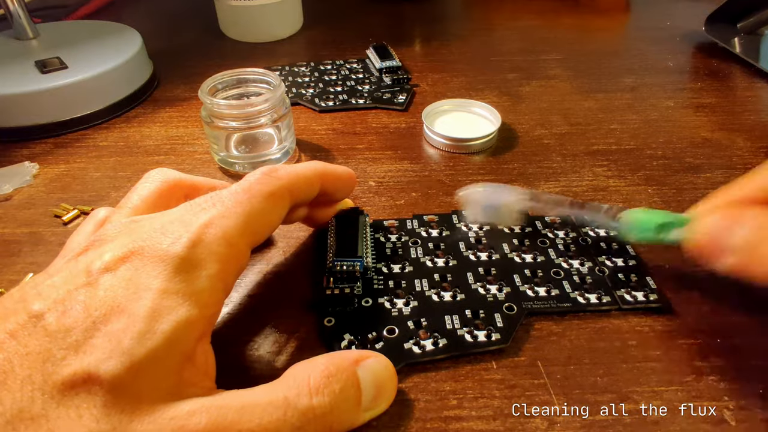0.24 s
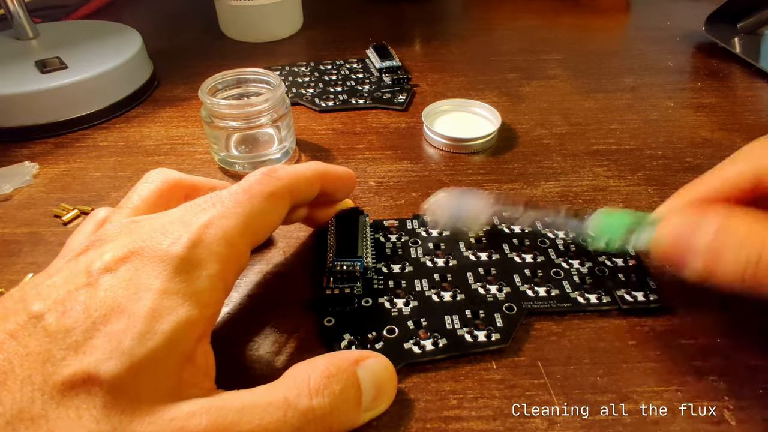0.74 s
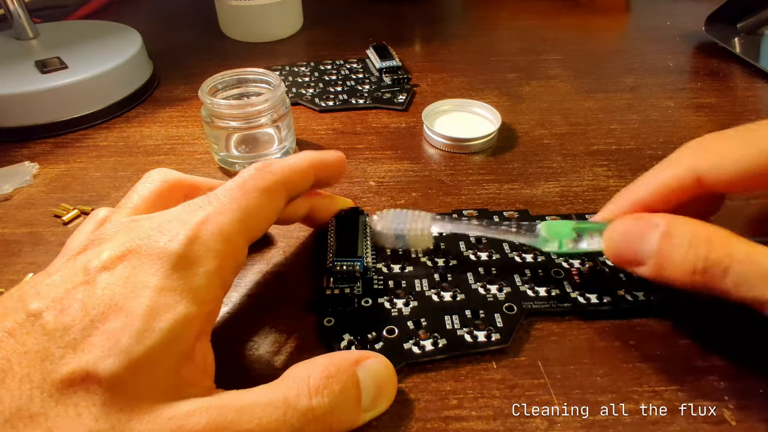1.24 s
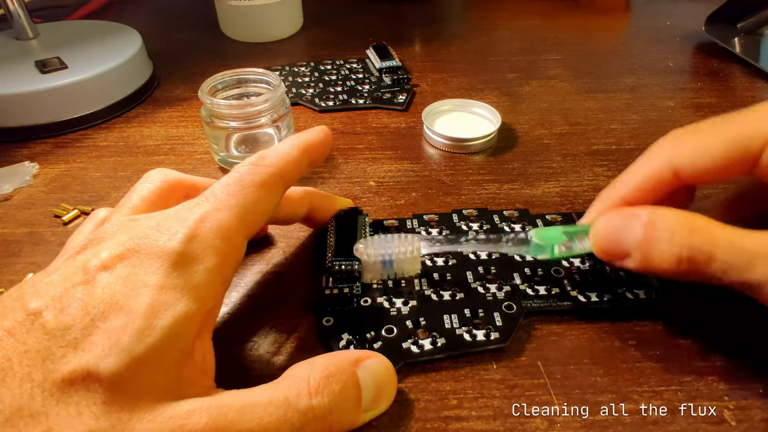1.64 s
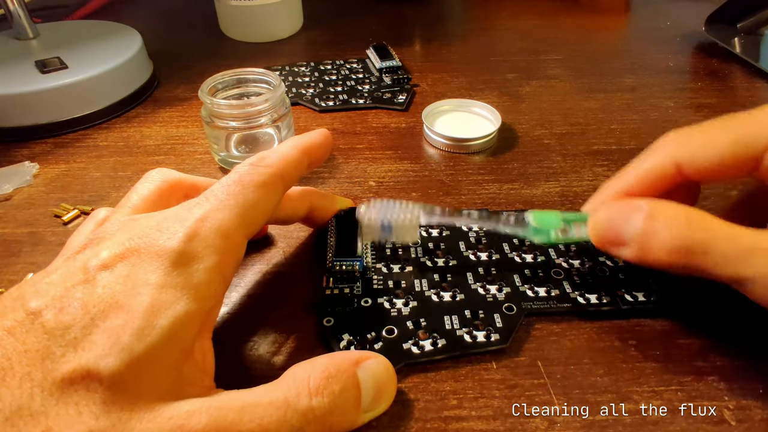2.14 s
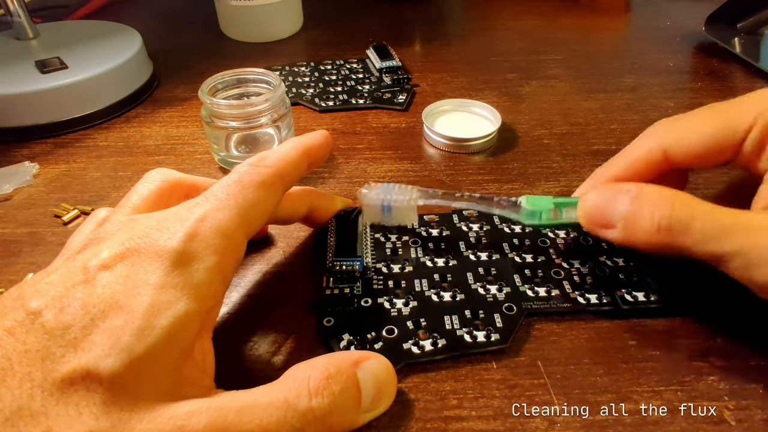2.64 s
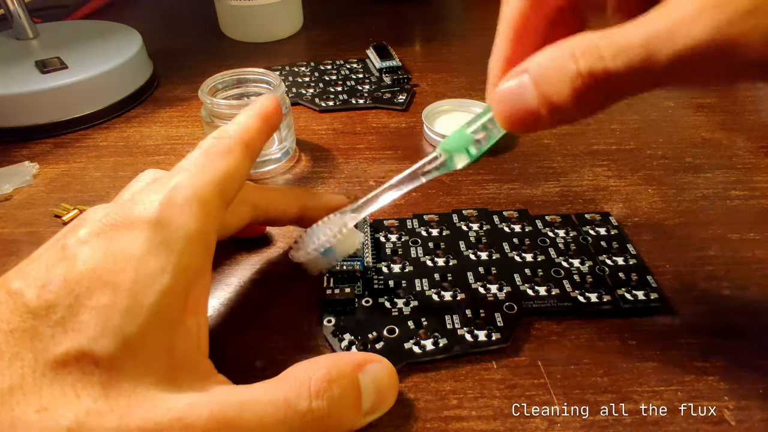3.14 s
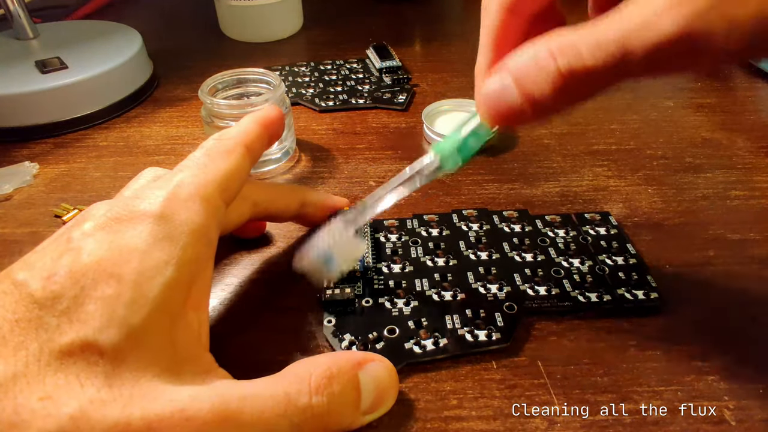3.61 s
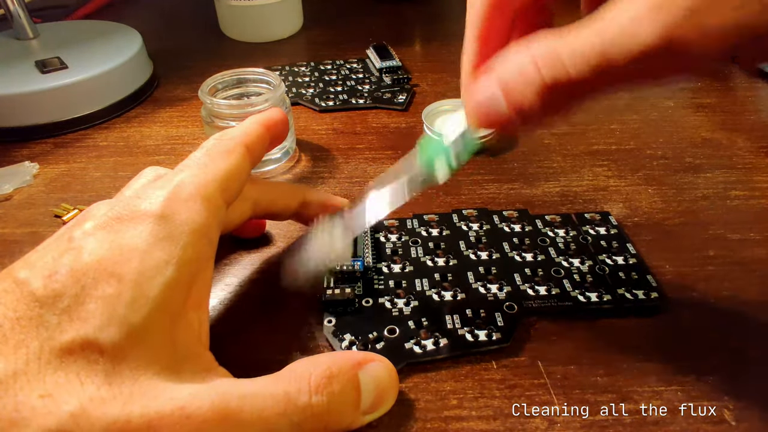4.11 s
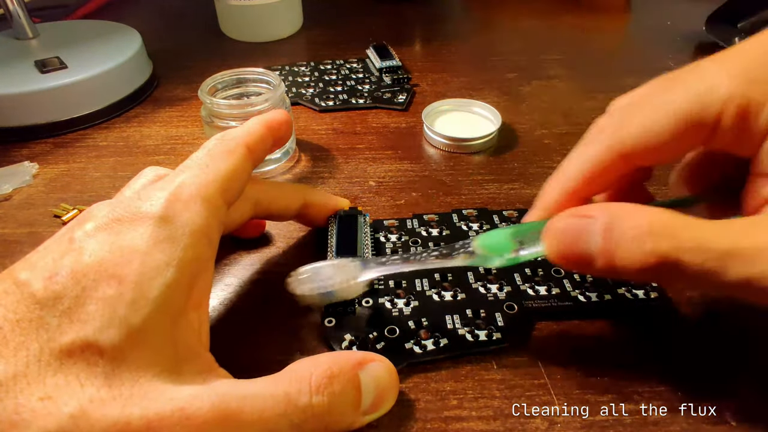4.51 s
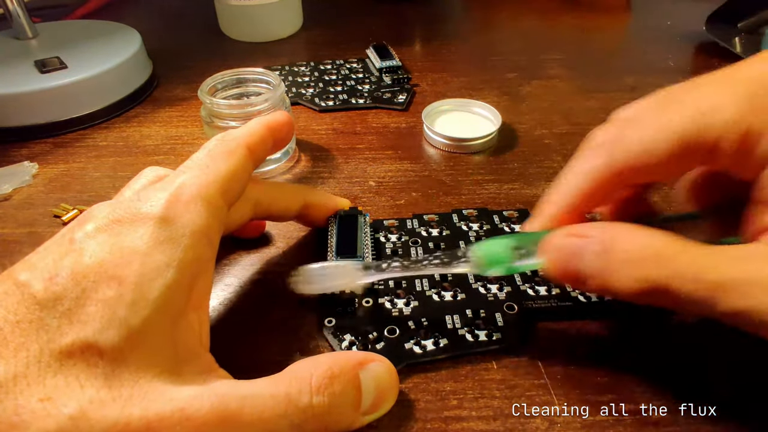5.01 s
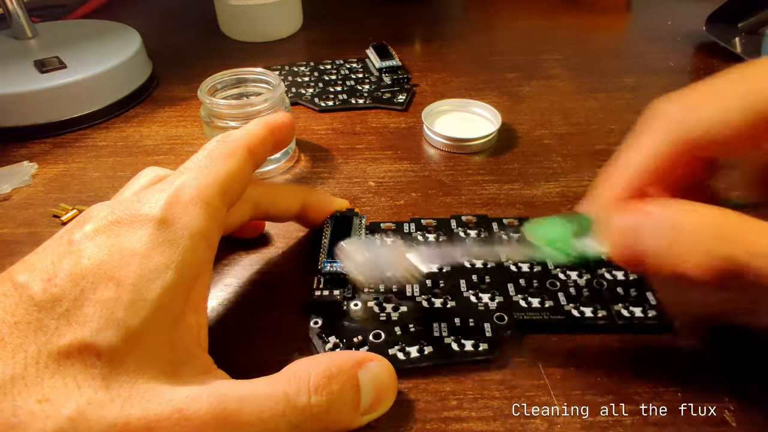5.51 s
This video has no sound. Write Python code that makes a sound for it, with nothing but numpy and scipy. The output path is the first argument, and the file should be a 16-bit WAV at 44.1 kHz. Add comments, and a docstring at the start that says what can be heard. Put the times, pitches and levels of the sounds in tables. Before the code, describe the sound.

A toothbrush scrubs a circuit board on a wooden desk in quick raspy strokes, pauses briefly, then ends with a sharp clack and scrape.

```python
"""Toothbrush on a circuit board

A toothbrush scrubs a circuit board held on a wooden desk, about nine strokes a second.
Random bristle clicks make the hiss and, through resonant filters, the rasp, plate tones and rattle.
Decaying board modes knock, and a low rumble, hums, a drone and room hiss lie underneath.
Near the end the board slips: filtered noise bursts clack, modes ring and grainy noise scrapes on wood."""
import sys
import numpy as np
from scipy import signal
from scipy.fft import rfft, irfft
from scipy.io import wavfile
from scipy.ndimage import uniform_filter1d, map_coordinates

SR = 44100
rng = np.random.default_rng(int(sys.argv[2]) if len(sys.argv) > 2 else 0)


def wav_record(signal):
    """Record a signal, one row per channel, as 16-bit PCM in the file named by sys.argv[1]."""
    frames = np.transpose(np.atleast_2d(signal))
    bounded = np.clip(frames, -1, 1)
    # unit amplitude maps onto the largest positive 16-bit level
    quanta = np.round(bounded * 32767).astype(np.int16)
    wavfile.write(sys.argv[1], SR, quanta)


N = 253575
TIME = np.arange(N) / SR

# Tables named SPECTRUM set a tone colour only; their overall level is normalised away.
# deep rumble under everything: t/s, level/dB
RUMBLE_LEVEL = [(1.2, -50.5), (1.55, -59), (2.4, -52), (4, -46.5)]
# rumble colour: f/Hz, density/dB per Hz
RUMBLE_SPECTRUM = [(10, -21), (28, 10), (60, -13), (300, -41.5)]
# upper hum that swells and fades: t/s, level/dB
HUM_LEVEL = [(3.6, -67.5), (4.6, -43.5), (5.2, -54.5)]
# low drone before its flutter: t/s, level/dB, f/Hz
DRONE = [(.85, -55, 125), (1.24, -37.5, 125), (1.399, -51, 129.2), (2.15, -52.5, 150.9), (3, -63, 149)]
# room hiss colour: f/Hz, density/dB per Hz
ROOM_TONE_SPECTRUM = [(35, -29.5), (60, -10.5), (156, -11), (613, -22.5), (15500, -54.5)]
# to-and-fro strokes: middle t/s, pressure as drive level of the hiss/dB
STROKES = [(0.041, -41.5), (0.127, -39.5), (.19, -42), (0.289, -38), (.417, -36), (.543, -36.5),
           (0.668, -37), (0.787, -36.5), (0.912, -37), (1.025, -37.5), (1.155, -39), (1.288, -45.5),
           (1.412, -51.5), (1.53, -45.5), (1.642, -40.5), (1.73, -59), (1.869, -54), (2.001, -57),
           (2.106, -50.5), (2.206, -51), (2.325, -49.5), (2.432, -44.5), (2.533, -45), (2.642, -43.5),
           (2.752, -43.5), (2.855, -37.5), (3.354, -53.5), (3.474, -48), (3.564, -43.5), (3.678, -43.5),
           (3.774, -40), (3.879, -42.5), (3.97, -39), (4.074, -44), (4.164, -36), (4.264, -42),
           (4.372, -46), (4.61, -54), (4.721, -42.5), (4.833, -41), (4.967, -39), (5.071, -40.5),
           (5.19, -37), (5.306, -37.5), (5.427, -34.5), (5.525, -40.5), (5.585, -38)]
# stroke length, long at first and shortest near the end: t/s, nominal length/s
STROKE_LENGTH = [(1.0, .1), (1.3, 0.067), (2.5, 0.082), (3.5, 0.059), (4.27, 0.056), (4.38, 0.097),
                 (5.43, 0.071), (5.53, 0.041)]
# board's answer where the brush works: t/s, extra rasp drive/dB, rattle drive over the rasp drive/dB
GRIP = [(.1, -1.5, 3.5), (.5, -1, -3), (1.1, -2, 6), (1.449, -1.5, -12), (1.97, -6, 2), (2.12, 2, -9.5),
        (2.7, 2.5, -6), (3.5, -1.5, -14), (3.9, -3, 6.5), (4.72, 2, -4), (5.399, 0.5, -4)]
# bristle hiss colour: f/Hz, density/dB per Hz
HISS_SPECTRUM = [(700, -16.5), (2200, -5.5), (3300, -2.5), (7500, 2), (10000, 0.5), (12000, -1.5),
                 (15000, 0.5)]
# rasp colour through the board: f/Hz, density/dB per Hz
RASP_SPECTRUM = [(70, -39.5), (110, 3), (150, 1.5), (220, -5.5), (380, 3.5), (530, 2.5), (820, -9),
                 (1250, -7), (2000, -14.5), (9000, -33)]
# hollow plate tones the bristles wake: centre f/Hz, width/Hz, relative level/dB
PLATE_TONES = [(695, 55, 0), (915, 60, -2), (1300, 190, -2.5)]
# board modes on the desk, main one second: f/Hz at BOARD_HZ, relative level/dB, t60/s
BOARD_MODES = [(144.9, -12, 0.22), (377, 9, 0.055), (498.5, -2.5, 0.072), (906, -9, 0.038),
               (1384, -22, 0.04)]
# board rocks against the desk: t/s, peak level/dB, tuning f/Hz against BOARD_HZ, swell/s
KNOCKS = [(0.133, -28, 348, 0.012), (0.284, -16, 350, 0.0018), (.548, -28, 360, 0.0027),
          (0.642, -25, 337, 0.0087), (0.793, -14, 371, 0.015), (.837, -27, 355, 0.0041),
          (1.034, -20, 366, 0.0077), (1.667, -29, 355, 0.0013), (1.829, -28.5, 328, 0.0026),
          (2.878, -21.5, 359, 0.0011), (2.991, -28.5, 344, 0.023), (3.75, -35, 374, 0.015),
          (4.126, -29.5, 376, 0.00095), (4.18, -29.5, 336, 0.012), (4.218, -27, 362, 0.0012),
          (4.364, -15.5, 347.5, 0.0028), (4.472, -32, 392, 0.0027), (5.519, -23.5, 409, 0.00066),
          (5.564, -20.5, 331, 0.00055), (5.616, -20.5, 380, 0.00067), (5.719, -34, 378, 0.0031)]
# short dry clicks of the brush, and the crack of two hard board knocks:
# t/s, level before colouring/dB, decay/s, dulling/dB per octave
CLICKS = [(0.284, -35, 0.003, 10), (0.997, -34.5, 0.0043, 6), (1.761, -39.5, 0.0037, 2),
          (2.479, -36.5, 0.0061, 9.5), (3.272, -45, 0.0089, 1), (4.361, -37.5, 0.0086, 14.5)]
# brush head catches on solder joints: t/s, level before colouring/dB
TAPS = [(.909, -35), (1.128, -37), (2.187, -38.5), (2.294, -40.5), (2.611, -36), (3.728, -39), (3.935, -40),
        (4.671, -36), (5.028, -32.5), (5.15, -36.5)]
# faint narrow bands of high hiss: middle t/s, length/s, level/dB, centre f/Hz
HISS_BANDS = [(1.404, 0.42, -56.5, 4200), (4.63, 0.11, -56, 4160)]
# colour of a narrow hiss band: multiple of the centre f, density/dB per Hz
BAND_SPECTRUM = [(.3, -10), (1.05, 0), (1.6, -24)]
# board skids on the wood: start t/s, length/s, level before side trim/dB, release/s, dulling/dB per octave
DRAG = [(5.521, 0.032, -31.5, 0.0059, 3.5), (5.632, 0.016, -34, 0.064, 1),
        (5.716, 0.016, -32.5, 0.0235, 1.2)]
# wood grain colour: f/Hz, density/dB per Hz
WOOD_SPECTRUM = [(60, -2), (175, 11.5), (400, 10), (900, 5.5), (3700, -2.5), (16000, -35)]
# board slaps down and chatters: t/s, level before colouring/dB, decay/s, dulling/dB per octave
CLACK = [(5.6107, -27, 0.0014, 21), (5.613, -3.5, 0.001, 2), (5.6155, -9.5, 0.0025, 0)]
# clack colour: f/Hz, density/dB per Hz
CRACK_SPECTRUM = [(50, -40), (160, 2), (800, 11.5), (1500, 3), (7500, -6.5), (11000, -16), (16000, -30)]
# hollow pock from the flat of the board: f/Hz, level before side trim/dB
SLAP = [(700, -15.5), (900, -16.5)]
# free ringing once the board slips from under the hand: f/Hz, level before side trim/dB
FREE_MODES = [(179, -23), (335, -22), (510, -24), (876, -28), (1564, -38), (2246, -42), (2576, -39),
              (3020, -39)]
# stereo width: f/Hz, left-right likeness (1 = same, 0 = unrelated, below 0 = opposed)
LIKENESS = [(450, 0.97), (670, -0.24), (800, 0.44), (1500, -0.23), (2200, -0.062)]
# room decay: f/Hz, t60/s
ROOM_DECAY = [(300, 0.41), (3000, 0.6), (12000, 0.18)]

LOW_HUM_HZ, HIGH_HUM_HZ = 33.3, 55.5
# the rasp grows more slowly than the hiss: drive dB at 0 dB pressure, dB per dB
RASP_DB, RASP_LAW = -18.5, 0.66
SETTLE_DB, SETTLE_S = -8, 0.05  # shuffle after every stroke: relative level, amplitude decay
PLATE_DB, PLATE_DRIFT = -2.5, .018  # mix gain, rms pitch shift from stroke to stroke as a share
BOARD_HZ = 365  # tuning at which the board modes keep their tabled pitch
HARD_DB, QUICK_S = -19, .005  # a knock louder and quicker than this bounces once
BOUNCE_S, BOUNCE_DB, BOUNCE_SWELL_S = 0.01106, -5.5, 0.0032  # delay, level against the knock, swell
TAP_PEAK_S = 0.0027  # a tap's envelope peaks here, then decays at the same pace
SKID_ATTACK_S, CLACK_RISE_S = 0.0028, 0.00012
SLAP_T60_S, FREE_T60_S = 0.029, 0.17
EDGE_HZ = 15950  # upper band limit


def amp(db):
    """Decibels to gain."""
    return 10 ** (np.asarray(db) / 20)


def evened(x):
    """Scales to rms 1."""
    return x / np.sqrt(np.mean(x ** 2) + 1e-20)


def read(points, hz):
    """Reads a spectrum table on a log-frequency axis."""
    f, value = np.transpose(points)
    return np.interp(np.log(hz + 1), np.log(f + 1), value)


def level(curve):
    """A dB curve as a gain for every sample."""
    return amp(np.interp(TIME, *np.transpose(curve)))


def add(mix, s, sound):
    """Mixes a sound in at time s."""
    part = mix[:, max(round(s * SR), 0):][:, :sound.shape[-1]]
    part += sound[..., :part.shape[-1]]


def colour(x, spectrum, tilt_db=0):
    """Minimum-phase filter of unit energy, then left and right share each band by its likeness."""
    hz = np.fft.rfftfreq(8192, 1 / SR)
    log_gain = np.log(amp(read(spectrum, hz) - tilt_db * np.log2(1 + hz / 500)))
    # the Hilbert transform of the log gain gives the phase that makes the filter causal
    mirrored = np.r_[log_gain, log_gain[-2:0:-1]]
    response = np.fft.ifft(np.exp(np.conj(signal.hilbert(mirrored)))).real[:len(hz)]
    response = response / np.linalg.norm(response)
    y = signal.fftconvolve(x, response[None], axes=1)[:, :N]
    same = np.clip(read(LIKENESS, np.fft.rfftfreq(y.shape[1], 1 / SR)), -1, 1)
    mid_side_gain = np.sqrt([(1 + same) / 2, (1 - same) / 2])
    mid, side = irfft(rfft(y) * mid_side_gain, y.shape[1])
    return np.array([mid + side, mid - side])


def noise(spectrum):
    """Steady two-channel noise of rms 1."""
    return evened(colour(rng.standard_normal((2, N)), spectrum))


def flutter(rate_hz, depth_db):
    """A random gain of rms 1 that wavers mostly slower than rate_hz."""
    hz = np.fft.rfftfreq(N, 1 / SR)
    slow = irfft(rfft(rng.standard_normal(N)) / (1 + (hz / rate_hz) ** 2), N)
    return evened(amp(depth_db * evened(slow)))


def tone(hz):
    """A sine of rms 1 that follows a pitch."""
    cycles = np.cumsum(hz * np.ones(N)) / SR
    return evened(np.sin(2 * np.pi * (cycles + rng.random())))


def background():
    """Low noise and a hum share one swell, over an upper hum, a wavering drone and room hiss."""
    low_hum = amp(-1.5) * tone(LOW_HUM_HZ) * flutter(rate_hz=3.2, depth_db=0.5)
    rumble = (noise(RUMBLE_SPECTRUM) + low_hum) * level(RUMBLE_LEVEL)
    high_hum = tone(HIGH_HUM_HZ) * level(HUM_LEVEL)
    s, db, hz = np.transpose(DRONE)
    drone = tone(np.interp(TIME, s, hz)) * level(np.c_[s, db]) * flutter(rate_hz=5.9, depth_db=5.5)
    return rumble + high_hum + drone + amp(-53.0) * noise(ROOM_TONE_SPECTRUM)


def strokes():
    """Every stroke: middle s, nominal length s, pressure dB."""
    s, pressure_db = np.transpose(STROKES)
    return np.array([s, np.interp(s, *np.transpose(STROKE_LENGTH)), pressure_db])


def flicks(per_s, spread_db):
    """Single bristles letting go: random clicks, a few of them large, rms 1."""
    size = amp(spread_db * np.minimum(rng.exponential(1, N), 4))
    fires = rng.random(N) < per_s / SR
    return evened(size * fires * rng.standard_normal((2, N)))


def sweep(levels_db, stretch, lean_db):
    """Each stroke builds up as the brush gathers speed, leans late and falls away at the turn."""
    s, length = strokes()[:2, :, None]
    t = TIME[::64]  # a coarse grid is enough for envelopes
    along = 2 * (t - s) / (np.maximum(length, .02) * stretch)  # -1 to 1 across the stroke
    caught = np.interp(along, [-1, -.8], [.65, 1])  # the bent tufts hold on, then start to slide
    drive = amp(levels_db[:, None] + lean_db * np.clip(along, -1, 1))
    power = (drive * caught / (1 + along ** 4)) ** 2
    return np.interp(TIME, t, np.sqrt(power.sum(0)))


def settling(push):
    """The board shuffles on: adds smoothed stroke power that dies away after each push."""
    keep = np.exp(-2 / (SETTLE_S * SR))
    shuffle_power = signal.lfilter([1 - keep], [1, -keep], push ** 2)
    return np.sqrt(push ** 2 + amp(SETTLE_DB) ** 2 * shuffle_power)


def placed(x, depth_db):
    """Every stroke runs over another part of the board and favours other resonances; rms 1."""
    hz, t, z = signal.stft(x, SR, nperseg=512)
    middles = strokes()[0]
    patches = rng.standard_normal((len(middles), 64))
    patches = evened(uniform_filter1d(patches, size=2, axis=1))
    stroke = np.interp(t, middles, np.arange(len(middles)))
    band = np.sqrt(hz / hz[-1]) * (patches.shape[1] - 1)
    gain = amp(depth_db * map_coordinates(patches, np.meshgrid(stroke, band), order=1))
    return evened(signal.istft(z * gain, SR, nperseg=512)[1][:, :N])


def plate():
    """Bristle flicks ring the plate tones, which shift a little as the brush loads another spot."""
    middles, out = strokes()[0], np.zeros((2, N))
    for hz, width, db in PLATE_TONES:
        drift = np.interp(TIME, middles, rng.standard_normal(len(middles)))
        # shift the clicks down by the moving pitch, low-pass them, and shift back up
        turn = np.exp(2j * np.pi * np.cumsum(hz * (1 + PLATE_DRIFT * drift)) / SR)
        keep = np.exp(-np.pi * width / SR)
        clicks = flicks(per_s=SR / 20, spread_db=1)
        narrow = signal.lfilter([1 - keep], [1, -keep], clicks / turn)
        out += amp(db) * evened((turn * narrow).real)
    return evened(colour(out, RASP_SPECTRUM))


def ring(hz, swell):
    """The board's modes, peak 1; a slow push builds up gently and wakes mostly the main one."""
    t = np.arange(SR // 4) / SR
    rise = np.sin(np.pi / 2 * np.minimum(t / max(swell, 1e-4), 1)) ** 2
    overtone_gain = 1.8 / (1 + swell / 0.0063)
    main_db = BOARD_MODES[1][1]
    out = np.zeros(len(t))
    for f, db, t60 in BOARD_MODES:
        fade = amp(db - 60 * np.maximum(t - swell, 0) / t60)
        gain = overtone_gain if db < main_db else 1
        out += fade * gain * np.sin(2 * np.pi * f * hz / BOARD_HZ * t)
    out *= rise
    return out / abs(out).max()


def scrubbing():
    """Bristle flicks hiss in the air, rasp through the board, ring its plate tones and set it rattling."""
    s, _, pressure_db = strokes()
    grip_s, extra_db, rattle_db = np.transpose(GRIP)
    rasp_db = RASP_DB + RASP_LAW * pressure_db + np.interp(s, grip_s, extra_db)
    # whole tufts catch and slip together, so every stroke is uneven
    tufts = flutter(rate_hz=55, depth_db=1.8)
    bristles = placed(colour(flicks(per_s=12000, spread_db=2), HISS_SPECTRUM), depth_db=2.26)
    hiss = bristles * sweep(pressure_db, stretch=0.96, lean_db=1.0) * tufts
    push = settling(sweep(rasp_db, stretch=1.01, lean_db=1.0))
    rasp = placed(colour(flicks(per_s=2500, spread_db=1.5), RASP_SPECTRUM), depth_db=2.5) * push
    hollow = plate() * push * np.sqrt(level(np.c_[grip_s, extra_db]))
    # solder joints jolt the brush head and wake the modes of the board
    jolts = flicks(per_s=1000, spread_db=3.0)[0] * push * level(np.c_[grip_s, rattle_db])
    shape = ring(hz=344, swell=0.0046)
    rattle = signal.fftconvolve(jolts, shape / np.linalg.norm(shape))[:N]
    hiss = hiss * amp([[-.4], [.4]])  # slightly to the right
    return hiss + amp(0.3) * rasp + amp(PLATE_DB) * hollow + amp(-0.5) * rattle


def knocks():
    """The board's modes ring as it rocks on the desk; a hard, quick knock bounces once."""
    out = np.zeros((2, N))
    for s, db, hz, swell in KNOCKS:
        add(out, s, amp(db) * ring(hz, swell))
        if db > HARD_DB and swell < QUICK_S:
            add(out, s + BOUNCE_S, amp(db + BOUNCE_DB) * ring(hz, BOUNCE_SWELL_S))
    return out


def dry_clicks():
    """Short clicks of the brush and the crack of two hard board knocks: decaying noise in two colours."""
    out, t = np.zeros((2, N)), np.arange(SR // 20) / SR
    for s, db, decay, dull_db in CLICKS:
        burst = amp(db) * rng.standard_normal((2, len(t))) * np.exp(-t / decay)
        through_board = amp(3.0) * colour(burst, RASP_SPECTRUM)
        add(out, s, colour(burst, HISS_SPECTRUM, dull_db) + through_board)
    return out


def taps():
    """The brush head catches on a joint and gives the board a small, soft tap."""
    out, age = np.zeros((2, N)), np.arange(SR // 12) / SR / TAP_PEAK_S
    for s, db in TAPS:
        grit = rng.choice([-1, 1], (2, len(age)))
        add(out, s, amp(db) * colour(grit * age * np.exp(1 - age), RASP_SPECTRUM))
    return out


def hiss_bands():
    """Faint narrow bands of high hiss swell and fade: noise filtered around a centre pitch."""
    out = np.zeros((2, N))
    for s, length, db, hz in HISS_BANDS:
        band = [(hz * ratio, band_db) for ratio, band_db in BAND_SPECTRUM]
        out += noise(band) * amp(db) * np.exp(-(2 * (TIME - s) / length) ** 4)
    return out


def skid(start, length, db, release, dull_db):
    """One skid over the grain of the wood: a quick attack, a hold and a dying release."""
    t = TIME - start
    grain = evened(colour(flicks(per_s=9800, spread_db=1.5), WOOD_SPECTRUM, dull_db))
    grain = grain * flutter(rate_hz=90, depth_db=2)
    attack = np.clip(t / SKID_ATTACK_S, 0, 1)
    return grain * amp(db) * attack * np.exp(-np.maximum(t - length, 0) / release)


def slip():
    """The board's edge slaps the desk in a quick chatter, drags over the grain of the wood and rings."""
    out, t = np.zeros((2, N)), np.arange(SR // 8) / SR
    for s, db, decay, dull_db in CLACK:
        envelope = np.minimum(t / CLACK_RISE_S, 1) * np.exp(-t / decay)
        burst = rng.choice([-1, 1], (2, len(t))) * envelope
        add(out, s, amp(db) * colour(burst, CRACK_SPECTRUM, dull_db))
    for hz, db in SLAP:
        add(out, CLACK[1][0], amp(db - 60 * t / SLAP_T60_S) * np.sin(2 * np.pi * hz * t))
    for hz, db in FREE_MODES:
        # modes reach the two sides out of step where left and right are unlike
        apart = rng.uniform(-np.pi, np.pi, (2, 1)) * (1 - read(LIKENESS, hz))
        add(out, CLACK[0][0], amp(db - 60 * t / FREE_T60_S) * np.sin(2 * np.pi * hz * t + apart))
    drag = sum(skid(*row) for row in DRAG)
    return (out + drag) * amp([[.3], [-.3]])  # slightly to the left


def room(x):
    """A small room: sparse random reflections after a short gap, each band with its own decay."""
    echoes = rng.standard_normal((2, SR // 2)) * (rng.random((2, SR // 2)) < 3000 / SR)
    echoes[:, :round(.008 * SR)] = 0
    hz, t, z = signal.stft(echoes, SR, nperseg=256)
    decay = amp(-60 * t / read(ROOM_DECAY, hz)[:, None])
    tail = signal.istft(z * decay, SR, nperseg=256)[1]
    return signal.fftconvolve(x, tail / np.linalg.norm(tail[0]), axes=1)[:, :N]


def scene():
    """Brush and board close by in a quiet room."""
    near = scrubbing() + knocks() + dry_clicks() + taps() + hiss_bands() + slip()
    return background() + near + amp(-13.0) * room(near)


def record(dry):
    """The recorder's band limit: a steep low-pass."""
    lowpass = signal.firwin(511, EDGE_HZ, window=("kaiser", 9), fs=SR)
    return signal.oaconvolve(dry, lowpass[None], "same")


dry = scene()
out = record(dry)
wav_record(out)
```